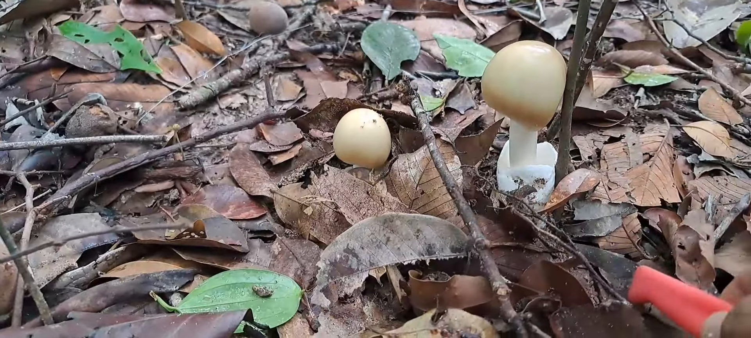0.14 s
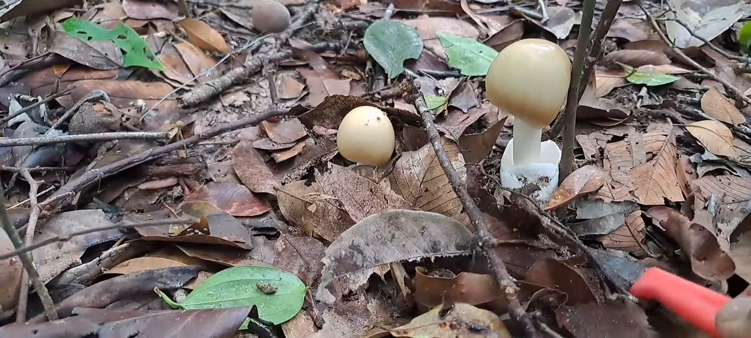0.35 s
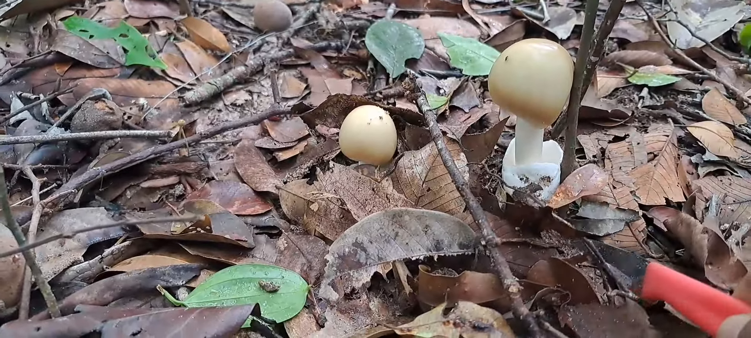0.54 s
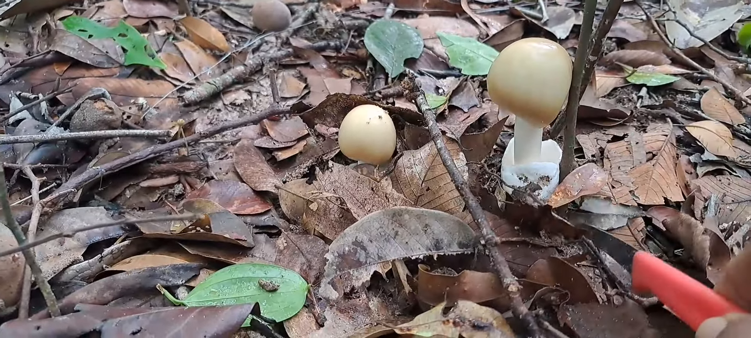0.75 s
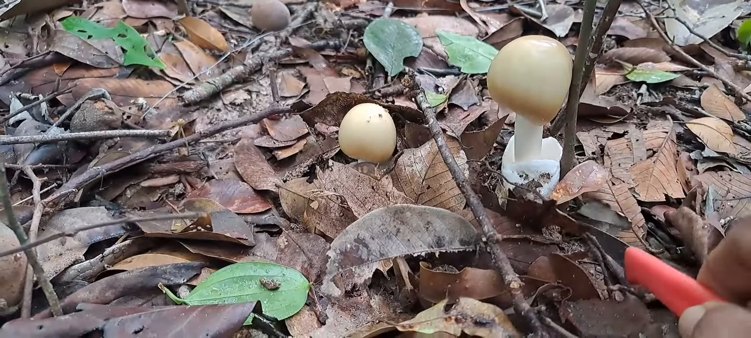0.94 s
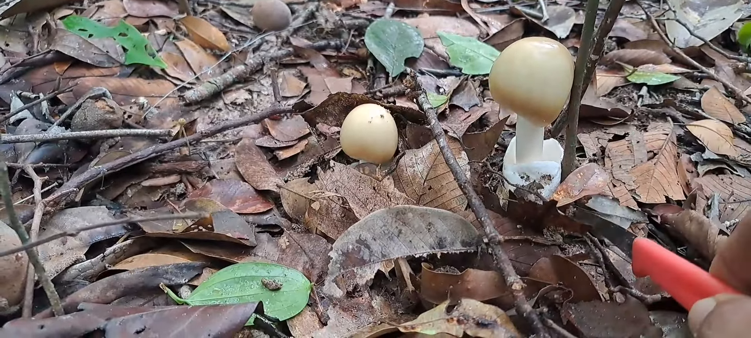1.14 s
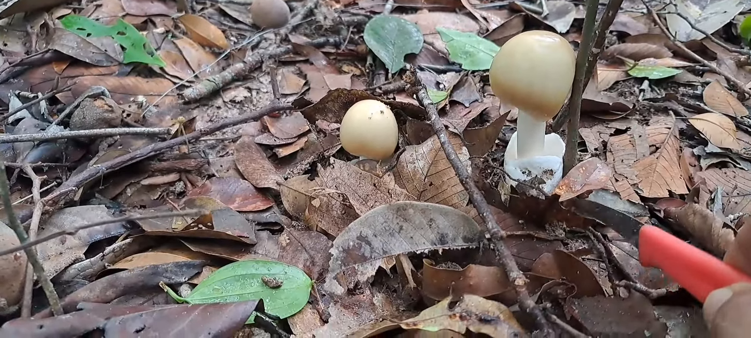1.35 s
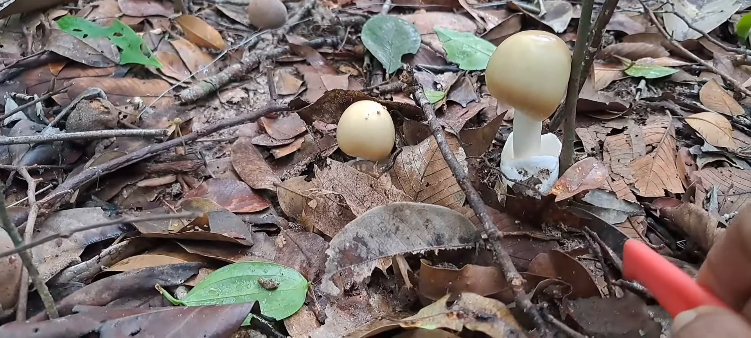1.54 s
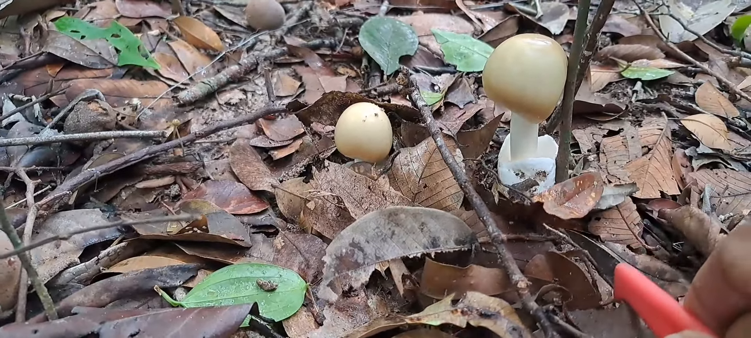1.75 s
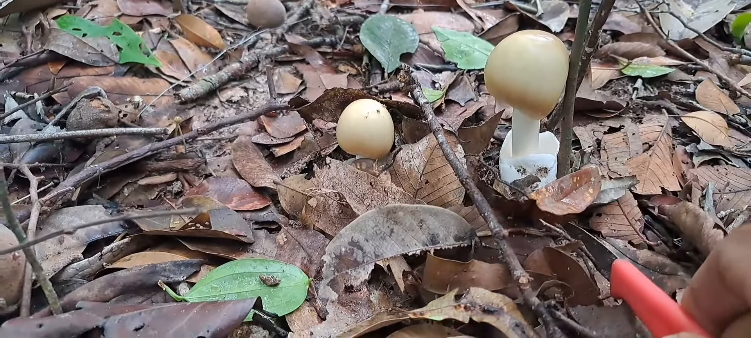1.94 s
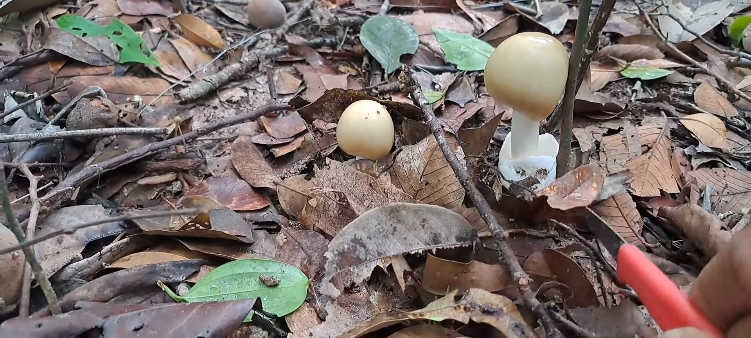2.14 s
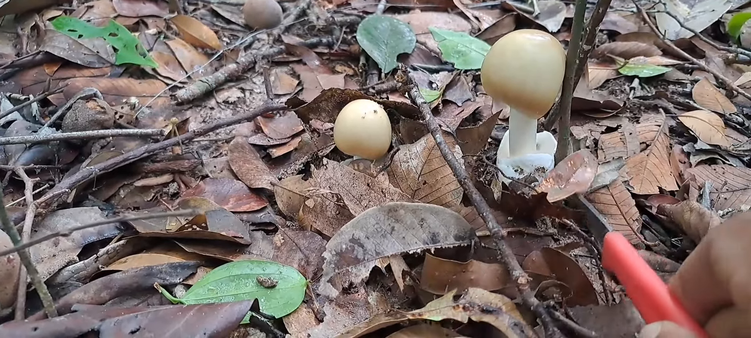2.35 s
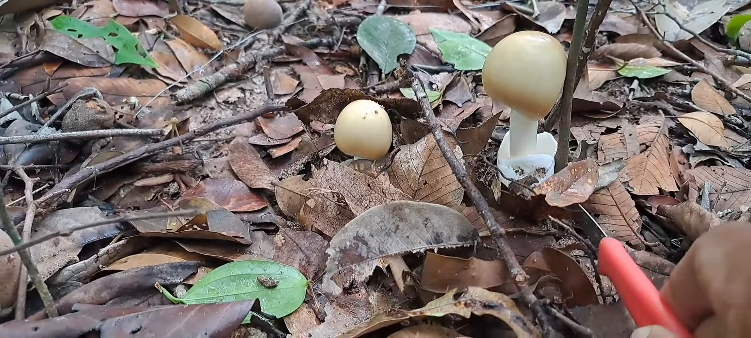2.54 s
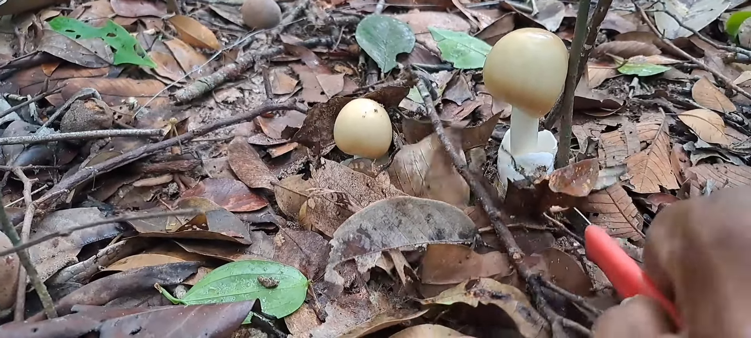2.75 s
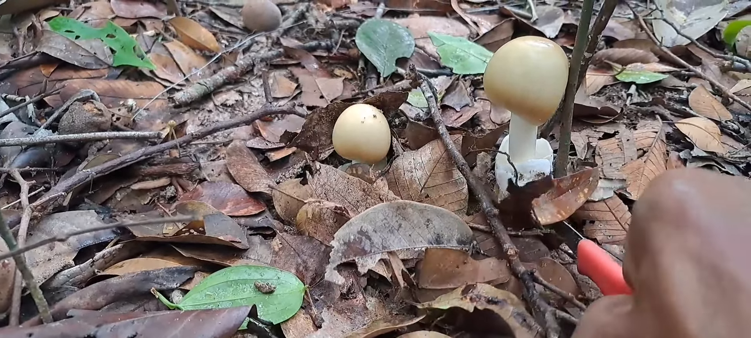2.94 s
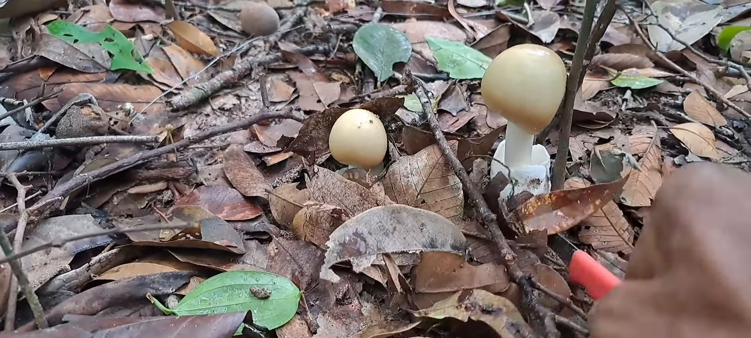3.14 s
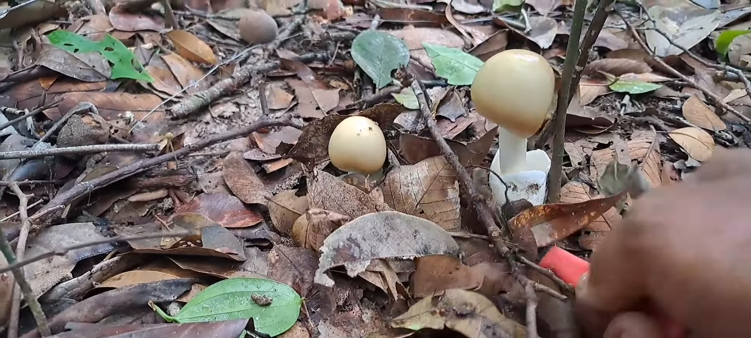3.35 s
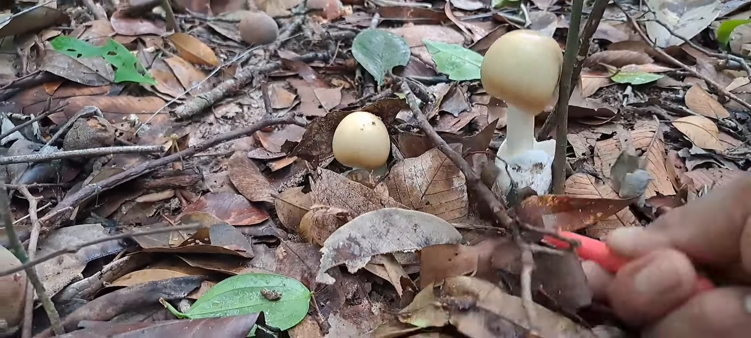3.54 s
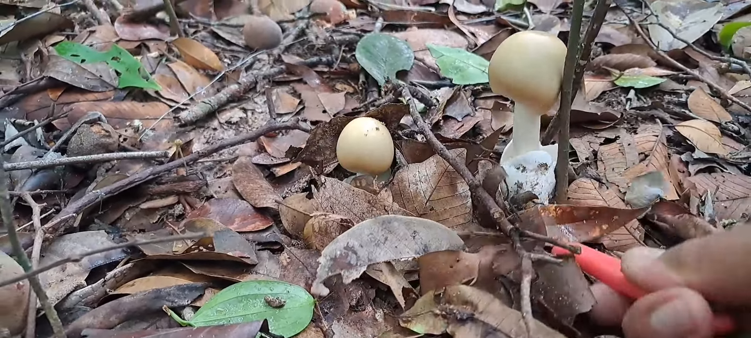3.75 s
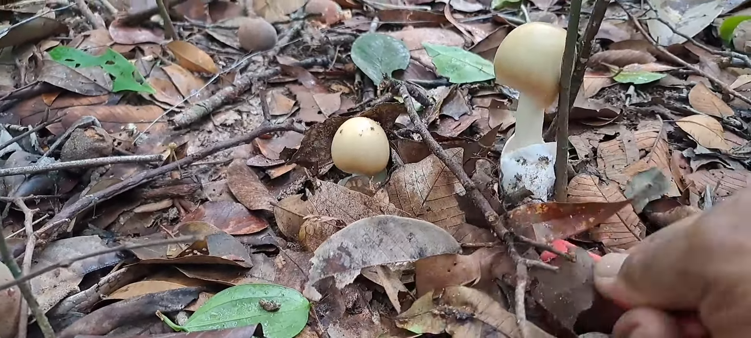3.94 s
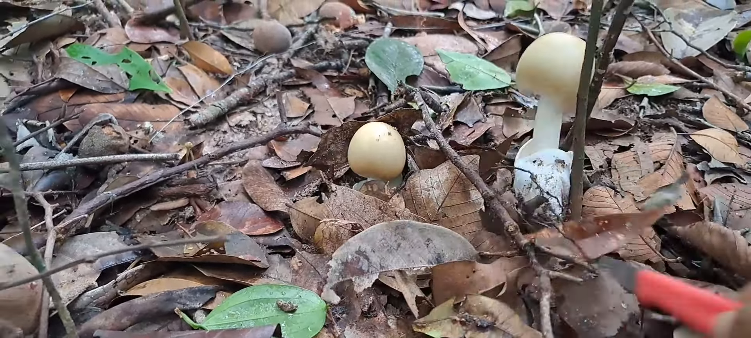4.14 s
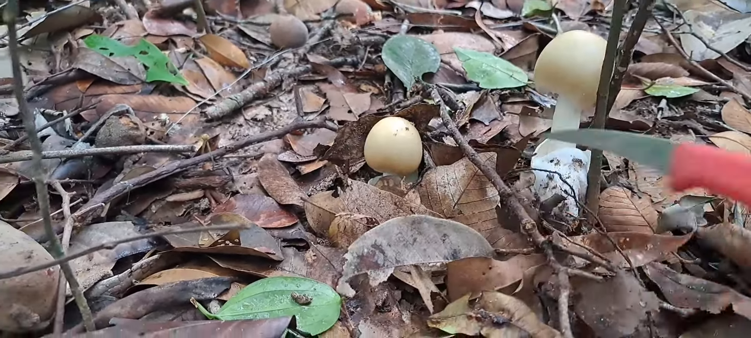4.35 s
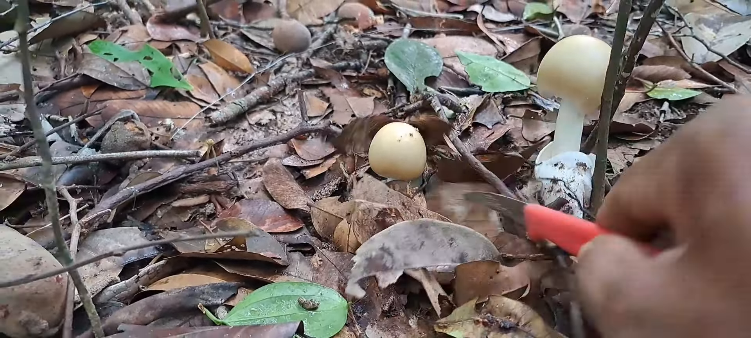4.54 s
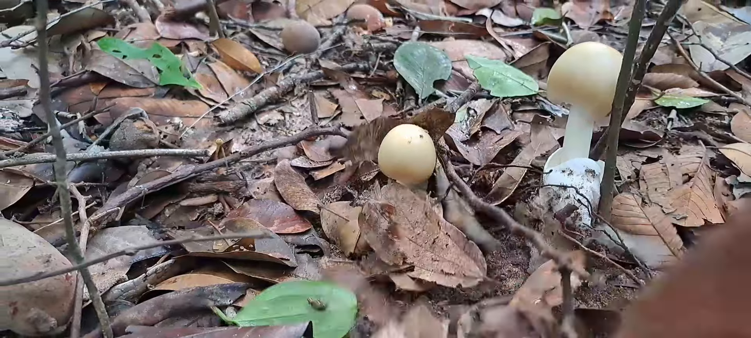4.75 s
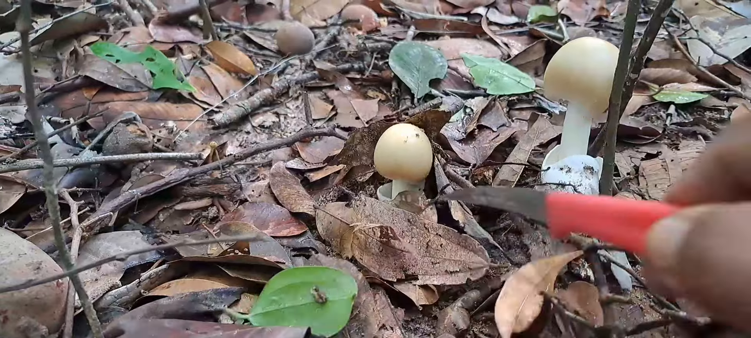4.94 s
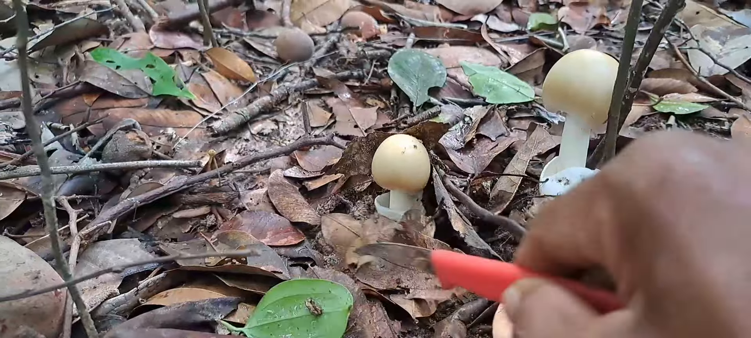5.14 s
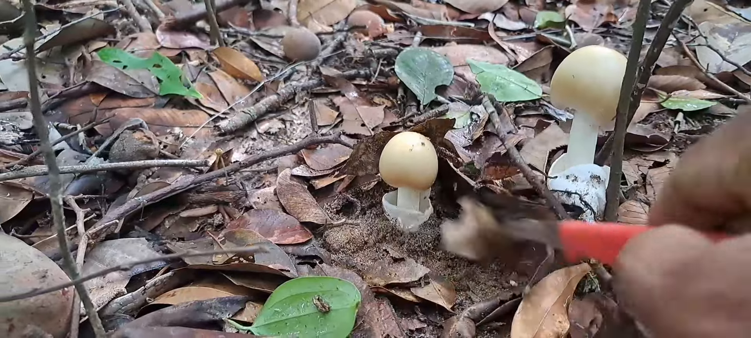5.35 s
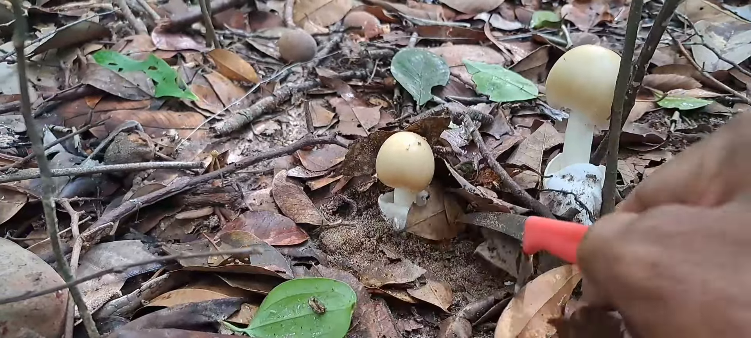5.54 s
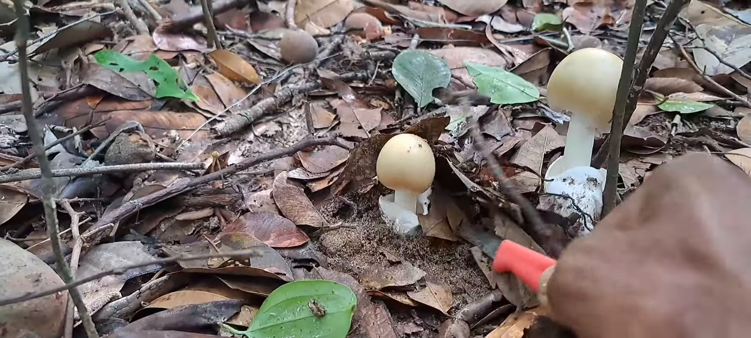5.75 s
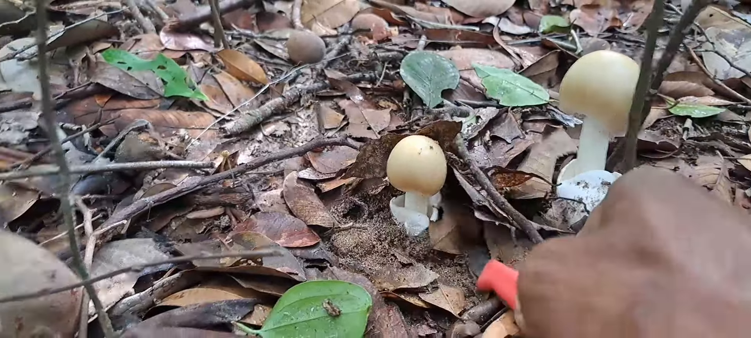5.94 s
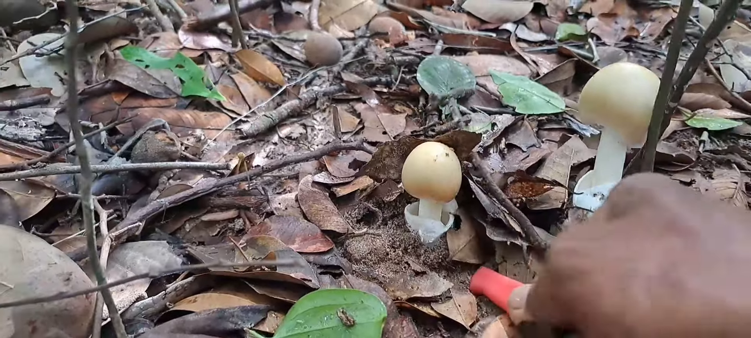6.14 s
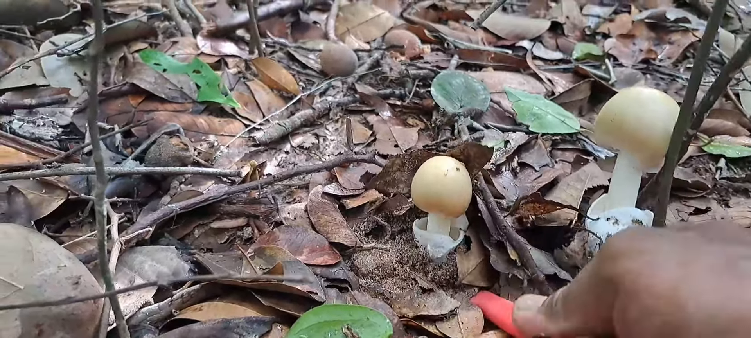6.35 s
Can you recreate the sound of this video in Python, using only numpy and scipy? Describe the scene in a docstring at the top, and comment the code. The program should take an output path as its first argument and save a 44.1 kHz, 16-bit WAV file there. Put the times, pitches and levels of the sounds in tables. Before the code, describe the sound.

Close up, a hand and small blade work through dry leaf litter in a quiet forest. Light rustles and small clicks thin out, then the crackling thickens, with a loud burst of crunches around the middle and another soon after. Soft thuds come from the soil. Far insects hum high and steady, and a bird twice whistles a quick rising run. Stereo microphones sit near the ground.

```python
"""Dry leaf litter rustles and crunches from the start as a hand with a small knife digs a forest floor.
The litter is shaken, spiky noise in third-octave bands; leaves and twigs break as short ringing noise bursts.
Far off, resonant noise makes an insect chorus, mostly near 7 kHz, over the smooth noise of the forest hush.
A bird twice whistles a note and five upward sweeps, with echoes; low noise swells thud in the soil.
All of it reaches two microphones, partly alike and partly unrelated, that ring near 13 kHz."""
import sys
import numpy as np
from scipy import signal
from scipy.io import wavfile

SR = 44100
rng = np.random.default_rng(int(sys.argv[2]) if len(sys.argv) > 2 else 0)


def wav_record(signal):
    """Record a signal, one row per channel, as 16-bit PCM in the file named by sys.argv[1]."""
    frames = np.transpose(np.atleast_2d(signal))
    bounded = np.clip(frames, -1, 1)
    # unit amplitude maps onto the largest positive 16-bit level
    quanta = np.round(bounded * 32767).astype(np.int16)
    wavfile.write(sys.argv[1], SR, quanta)


N = 285812   # samples

# how alike near litter sounds at the two microphones: (f/Hz, likeness from -1 to 1)
NEAR_LIKENESS = [(60, 0.15), (180, 0.796), (550, 0.769), (1650, 0.74), (4970, 0.05), (15000, 0.023)]
# balance of the two microphones: (f/Hz, left-right level/dB)
MICROPHONE_BALANCE = [(60, -2), (300, 1.5), (1500, 0), (5000, 0), (9000, 5), (15000, 5)]
FAR_PAN_DB = -3.5   # far sounds lean right


def amp(db):
    """Decibels to gain."""
    return 10 ** (np.asarray(db) / 20)


def rms_one(x):
    """Scale to rms 1."""
    return x / np.sqrt(np.mean(x ** 2) + 1e-20)


def at_hz(points, hz):
    """Read a (f/Hz, value) table on a log-frequency axis."""
    table_hz, values = np.transpose(points)
    return np.interp(np.log(hz), np.log(table_hz), values)


def band(x, low_hz, high_hz):
    """Butterworth band-pass."""
    edges_hz = [low_hz, min(high_hz, .45 * SR)]
    return signal.sosfilt(signal.butter(2, edges_hz, "band", fs=SR, output="sos"), x)


def resonate(x, hz, width_hz):
    """Two-pole resonance with gain 1 on top."""
    r = np.exp(-np.pi * width_hz / SR)
    feedback = [1, -2 * r * np.cos(2 * np.pi * hz / SR), r * r]
    return signal.lfilter([(1 - r * r) / 2, 0, (r * r - 1) / 2], feedback, x)


def left_right(pan_db):
    """Gains of the two microphones for a left-right difference in dB."""
    return amp(np.array([pan_db, -pan_db]).reshape(2, -1) / 2)


def pair(mid, side, likeness, pan_db):
    """Left and right from a shared and an opposed part."""
    likeness = np.clip(likeness, -.95, .95)
    shared = np.sqrt(1 + likeness) * mid
    opposed = np.sqrt(1 - likeness) * side * np.array([[1], [-1]])
    return (shared + opposed) / np.sqrt(2) * left_right(pan_db)


def swells(s, swell, fade, peak_db, steep=1):
    """Power of each event every millisecond: straight up and down in dB around its loudest moment."""
    t = np.arange(0, N / SR + .001, .001)[:, None] - s
    steps = np.where(t < 0, -t / np.abs(swell), t / np.abs(fade))   # of 20 dB, before steepening
    drop_db = 20 * np.minimum(steep * steps, 6)
    return amp(2 * (peak_db - drop_db))   # doubled dB: power


def per_sample(values):
    """From one value a millisecond to one a sample."""
    return np.interp(np.arange(N) / SR, np.arange(len(values)) / 1000, values)


def level_of(power):
    """Summed power of the events, in dB per sample."""
    return per_sample(10 * np.log10(power.sum(axis=1)))


def pushing():
    """Levels of soil, leaf bodies, blades and crisp edges, and the left-right dB weighted by blade power."""
    # pushes through the leaves: (loudest t/s, swell in s per 20 dB, fade in s per 20 dB, blade level/dB,
    # body level above blades/dB, edge level above blades/dB, left-right level/dB);
    # signs of the times are ignored, and the steepness shortens them
    pushes = [(0.0, .05, 0.1482, -65.5, 3, 6.5, -6.5), (.16, 0.2254, 0.31, -68, -7.5, 11, -5.5),
              (.22, 0.24, 0.055, -68, -2, 9.5, -6), (.3, 0.2067, 0.1, -70.5, 8.5, 1.5, -7),
              (0.411, -0.19, 0.16, -67, -1, 5.5, -8), (.472, -0.04, 0.31, -67.5, -9.5, 9.5, -5),
              (0.521, 0.0519, .07, -65, 5.5, -5, -11), (.71, 0.3133, 0.0632, -63.5, 0, 3, -6),
              (.905, -0.07, -0.48, -70.5, -6, 5.5, -5.5), (.94, 0.0418, 0.122, -60, -6.5, 4.5, -5.5),
              (1.019, 0.24, 0.1078, -69.5, 4.5, 9, -8.5), (1.189, 0.19, .035, -64.5, -10.5, 12, -6.5),
              (1.335, 0.23, 0.11, -78, -16.5, 16.5, -4.5), (1.43, 0.08, 0.165, -75, 6.5, 8.5, -11.5),
              (1.69, -0.06, 0.15, -73, -6, 6, -5), (1.759, 0.0781, 0.11, -69, 7.5, 7.5, -5.5),
              (1.94, 0.18, .09, -76.5, -5, 13.5, -5.5), (2.16, -0.43, 0.1, -74, -15, -2, -7),
              (2.24, 0.1256, 0.1272, -72, 0.5, 7.5, -6), (2.39, 0.13, 0.3, -79.5, 0, 13.5, -3),
              (2.6, 0.15, 0.91, -78.5, 1.5, 16.5, -2), (2.73, 0.1187, 0.2255, -60, 6.5, 4.5, -1.5),
              (2.96, 0.1971, 0.11, -67, 3, 6.5, -6), (3.069, 0.13, 0.11, -66, 5, 8, -4.5),
              (3.17, 0.05, -0.27, -65.5, 2.5, 8, -6), (3.225, 0.068, -0.05, -63.5, 4.5, 5, -5.5),
              (3.331, 0.0818, 0.143, -56.5, 7.5, 7.5, -4.5), (3.38, 0.1145, 0.214, -55, 7, 6, -4),
              (3.552, 0.13, 0.166, -54.5, 5.5, 8.5, -7.5), (3.655, 0.1533, 0.0539, -62, 2, 6, -7.5),
              (3.751, 0.0241, 0.35, -60.5, 0.5, 8, -6.5), (3.849, 0.0575, 0.0519, -56.5, 5, 8, -5),
              (3.91, 0.1227, 0.135, -61, 6, 5, -4), (3.976, 0.15, 0.02, -59.5, -1.5, 8, -6.5),
              (4.13, 0.0908, 0.1026, -51, 2.25, 8, -5), (4.19, 0.1555, 0.1709, -55.5, 3, 11, -6.5),
              (4.455, 0.16, 0.03, -82, 9, 13, -9), (4.524, .003, 0.5047, -62, 4.5, 0.5, -0.24),
              (4.559, 0.01, 0.0591, -43, 2.5, 1.5, -0.3), (4.603, .015, 0.071, -42.5, 2.82, -1.5, -1.6),
              (4.683, 0.0612, 0.1207, -46, 2, 4, -2), (4.725, 0.0657, 0.0831, -42.5, 2.5, 6.5, -5),
              (4.772, 0.0643, 0.1361, -38, 4.5, 6, -2.5), (5.18, 0.0164, 0.2231, -59, -13, 11.5, 0.1),
              (5.25, 0.1021, 0.0446, -56, 8.5, 10.5, 0.27), (5.289, 0.0849, 0.0532, -39.5, 4, 6.5, -1),
              (5.345, 0.0484, 0.17, -58.5, 0, 7.5, -4), (5.435, 0.3548, -0.08, -66, -1, 4, -3.5),
              (5.567, 0, .07, -59, 1, 6.5, -2.5), (5.631, 0.0523, 0.23, -54, 4, 8, -2.5),
              (5.719, 0.1416, 0.27, -59.5, 2, 6.5, -3), (5.8, 0.1549, 0.04, -58, 1, 7, -3),
              (5.87, 0.305, 0.35, -59.5, 0.5, 3, -3), (5.95, 0.2455, 0.2743, -58, 3.5, 9, -3),
              (6.05, 0.25, 0.25, -58, 1, 8.5, -3), (6.121, 0.1282, 0.0638, -52, 4.5, 3.5, -3.5),
              (6.231, 0.1061, 0.17, -63.5, 7, 10.5, -3.5), (6.356, .06, 0.1027, -51, 4.5, 8, -6.5),
              (6.429, 0.196, -0.11, -53, -0.5, 5.5, -5)]
    # how far soil and stems lie below the leaf bodies, less where the blade digs deep: (t/s, level/dB)
    soil_below = [(0, 5), (.3, 7), (.7, 14), (1.1, 3), (1.5, 11), (2.2, 9), (2.7, 8), (3.15, 11.5),
                  (3.35, 2), (3.6, 9.5), (4.0, 3.5), (4.4, 11), (4.6, 4.5), (4.8, 7), (5.2, 15.5),
                  (5.3, 2.5), (5.6, 8), (6.0, 4), (6.25, 7), (6.45, 8)]
    # slope factors of soil, bodies, blades and edges: heavy parts start later and stop sooner
    steepness = [1.162, 1.228, 1.061, 1.032]
    s, swell, fade, blades_db, bodies_db, edges_db, pan_db = np.transpose(pushes)
    soil_db = bodies_db - np.interp(s, *np.transpose(soil_below))
    above_blades = [soil_db, bodies_db, 0, edges_db]
    powers = [swells(s, swell, fade, blades_db + above_db, steep)
              for above_db, steep in zip(above_blades, steepness)]
    blades = powers[2]
    pan = per_sample(blades @ pan_db / blades.sum(axis=1))
    return [level_of(power) for power in powers], pan


def cracks(per_s, spread_db):
    """Random needle clicks of uneven size and sign; rms 1."""
    sizes = amp(spread_db * np.minimum(rng.exponential(1, N), 4)) * rng.choice([-1, 1], N)
    return rms_one(sizes * (rng.random(N) < per_s / SR))


def shaking(per_s, spread_db, last_s):
    """Power of bursts that die away quickly after each crack; mean 1."""
    kicks = cracks(per_s, spread_db) ** 2 + 1e-9
    power = signal.lfilter([1], [1, -np.exp(-1 / (last_s * SR))], kicks)
    return power / power.mean()


def rustle():
    """Third-octave noise shaken by a dense bed, bursts shared by all or by a region, and bare clicks."""
    # f/Hz where the levels of soil, bodies, blades and edges apply
    region_hz = [480, 1550, 5600, 12000]
    # colour of the litter: (f/Hz, third-octave level/dB added to the pushing)
    leaf_colour = [(150, -16.5), (300, -11), (600, -7), (1500, -5), (3300, -3), (4500, 3.5), (5600, 3.5),
                   (7500, 1), (9500, -8), (12500, -0.5), (15500, -11)]
    lag_s_per_db = 2e-5   # a source nearer the right microphone reaches the left one later
    levels, pan_db = pushing()
    wide = shaking(per_s=120., spread_db=4., last_s=0.00765)
    regions = [shaking(per_s=300., spread_db=4., last_s=0.00114) for _ in region_hz]
    white = rng.standard_normal((2, 2, N))   # neighbouring bands get unrelated noise
    shaken = [white * np.sqrt(0.25 + 0.381 * wide + 0.1734 * own) for own in regions]
    needles = cracks(per_s=190.0, spread_db=10.0) * rng.standard_normal((2, N))   # each lands elsewhere
    out, edges_hz = 0, 130 * 2 ** (np.arange(22) / 3)
    for k, (low, high) in enumerate(zip(edges_hz, edges_hz[1:])):
        hz = np.sqrt(low * high)
        place = np.interp(np.log(hz), np.log(region_hz), range(4))
        below = min(int(place), 2)
        level_db = levels[below] + (place - below) * (levels[below + 1] - levels[below])
        source = shaken[int(round(place))][k % 2] + 0.4065 * needles
        mid, side = rms_one(band(source, low, high))
        both = pair(mid, side, at_hz(NEAR_LIKENESS, hz), at_hz(MICROPHONE_BALANCE, hz))
        out = out + amp(level_db + at_hz(leaf_colour, hz)) * both
    lag = np.round(pan_db * lag_s_per_db * SR)   # whole samples
    out[0] = np.interp(np.arange(N) + lag, np.arange(N), out[0])
    return out * left_right(pan_db)


def hush():
    """Smooth far noise of the forest, half an octave at a time."""
    # colour of the hush: (f/Hz, relative level per Hz/dB)
    air_colour = [(15, -39), (25, 1), (124, 5), (1090, -12), (1730, -12.5), (1980, 3), (3230, -40),
                  (5270, -32.5), (7110, 8.5), (9330, -15), (13300, -2.5), (15200, -14), (16500, -33)]
    # how alike the hush is at the two microphones: (f/Hz, likeness from -1 to 1)
    far_likeness = [(60, 0.83), (240, 0.64), (950, -0.16), (3770, 0.36), (15000, -0.26)]
    out, edges_hz = 0, 22 * 2 ** (np.arange(20) / 2)
    white = rng.standard_normal((2, 2, N))   # neighbouring bands get unrelated noise
    for k, (low, high) in enumerate(zip(edges_hz, edges_hz[1:])):
        hz = np.sqrt(low * high)
        mid, side = band(white[k % 2], low, high)
        pan_db = at_hz(MICROPHONE_BALANCE, hz) + FAR_PAN_DB
        out = out + amp(at_hz(air_colour, hz)) * pair(mid, side, at_hz(far_likeness, hz), pan_db)
    return amp(-67.5) * rms_one(out)


def insects_and_microphone_ring():
    """Far singers blur into resonant noise, unrelated left and right; the microphones ring near 13 kHz."""
    # resonances of the far noise: four of the insect chorus, and a wide microphone resonance near 13 kHz:
    # (f/Hz, width of each of two passes/Hz, level before panning/dB)
    resonances = [(6864, 332, -67), (7315, 433, -69), (5986, 1500, -74), (13000, 1800, -79.5),
                  (2024, 320, -87)]
    out = 0
    for hz, width_hz, level_db in resonances:
        once = resonate(rng.standard_normal((2, N)), hz, width_hz)
        out = out + amp(level_db) * rms_one(resonate(once, hz, width_hz))
    return out * left_right(FAR_PAN_DB)


def add_break(out, fade, s, peak_db, ring_hz, tilt_db, pan_db):
    """Noise under a fade, in three colours, plus one narrow ring: of the piece or, near 12.5-13 kHz and
    above, of the microphone."""
    # colours of a break: (low f/Hz, high f/Hz)
    colours = [(380, 1139), (1500, 8330), (10500, 13850)]
    low_db, mid_db, high_db = tilt_db / 2, 5, -tilt_db / 2
    ring_db = max(low_db, mid_db, high_db) + 1.5
    noise = rng.standard_normal((2, len(fade))) * fade
    filtered = [band(noise, low, high) for low, high in colours]
    filtered.append(resonate(noise, ring_hz, ring_hz / 5.04))
    shares = [(low_db, 600), (mid_db, 3400), (high_db, 12400), (ring_db, ring_hz)]   # (dB, Hz of likeness)
    burst = 0
    for (share_db, hz), part in zip(shares, filtered):
        mid, side = rms_one(part)
        burst = burst + amp(share_db) * pair(mid, side, at_hz(NEAR_LIKENESS, hz), pan_db)
    at = round(s * SR)
    peak = np.abs(burst.mean(axis=0)).max()   # of the mean of both microphones
    out[:, at:at + len(fade)] += amp(peak_db) * burst / peak


def crunches():
    """Whole leaves crushed: each noise burst swells for a moment and crumbles away."""
    # (t/s, peak level/dB, narrow ring f/Hz, low above high share level/dB, left-right level/dB)
    crushed = [(.16, -45.5, 14300, -18.5, -0.5), (.684, -45.5, 5200, -17, -8.5), (.7, -48, 1815, -16.5, -5),
               (1.169, -50, 13150, -31, -2), (1.746, -45.5, 6500, -4, -0.47),
               (2.159, -51.5, 6760, -10, -4.5), (2.234, -59, 2400, -4, -3), (2.347, -63, 447, 23, -1.13),
               (2.39, -59, 414, 15, -0.24), (2.723, -43, 1370, 0.7, -5), (2.778, -36, 3370, 1.2, -2),
               (2.959, -48, 7130, -3.5, 2.5), (3.212, -43.5, 4260, -8.5, -8),
               (3.224, -46.5, 4290, 1.98, -2.7), (3.329, -31, 399, 22, -2.53),
               (3.369, -29.5, 1860, 8, -2.3), (3.392, -33.5, 4840, -10.5, 2), (4.253, -34, 7400, -19, -5.5),
               (4.557, -30, 730, -12.5, -2.5), (4.608, -26.5, 5850, -23.5, -4.5),
               (4.679, -28, 4600, -10.5, -2.26), (4.71, -23.5, 2140, 12, -2),
               (4.72, -20.5, 4670, 0.9, 1.28), (4.768, -20.5, 11600, -4, 7), (5.212, -27.5, 1915, -18.5, 4),
               (5.266, -26.5, 11800, -18.5, 11.5), (5.277, -21, 6840, -9, -0.97),
               (5.941, -36.5, 1990, -11, -1.4)]
    swell_s, t60_s = 0.00189, 0.0392
    out, t = np.zeros((2, N + 3000)), np.arange(3000) / SR
    fade = np.minimum(t / swell_s, 1) * amp(-60 * t / t60_s)
    for crunch in crushed:
        add_break(out, fade, *crunch)
    return out[:, :N]


def snaps():
    """Leaves and twigs snap: noise bursts crack sharply about 1 ms in and rattle faintly on."""
    # (t/s, peak level/dB, narrow ring f/Hz, low above high share level/dB, left-right level/dB)
    snapped = [(.469, -33, 7400, -19, -5), (.522, -49, 1000, -1.5, -5), (.59, -37.5, 7000, -21, 2.1),
               (.664, -38.5, 6500, -21, -4.5), (.939, -33, 12700, -17.5, -0.17),
               (.974, -46.5, 12600, -7.5, 0), (1.088, -42, 6780, -26.5, -6), (1.349, -57, 890, 8, -3.5),
               (1.457, -54, 6910, -14.5, -9.5), (1.146, -48, 6760, -34.5, -1.5),
               (1.692, -50, 7450, -5.5, 5), (1.778, -42.5, 7000, -15.5, -0.57),
               (1.883, -51, 4780, -29.5, -3.5), (1.929, -49, 7110, -28, 0.5),
               (2.607, -31.5, 10900, -16.5, 1.5), (2.685, -33.5, 3760, -9, 0.5),
               (2.715, -37.5, 3860, 7, -3.36), (2.765, -41, 3500, -3.1, -2.2),
               (2.879, -37, 7140, -16, -0.5), (3.041, -41.5, 4230, -10.5, -10),
               (3.05, -38, 4200, -13.5, -3.6), (3.312, -35, 5000, -11.5, -1), (3.319, -34, 5070, -21, -3),
               (3.329, -35, 755, 5, -7), (3.441, -34, 4760, 12.5, -10.5), (3.496, -39, 4680, -15.5, -10.5),
               (3.552, -32, 12700, -4.5, -5), (3.604, -30.5, 6850, -10.5, -4.16),
               (3.657, -35, 13100, -12, -13), (3.735, -40, 6940, -8, -3), (3.76, -34.5, 7040, -21.5, -7),
               (3.824, -32, 7400, -13, -5), (3.863, -35, 7000, -3.32, -9.5),
               (3.942, -40.5, 12700, -23.5, -8), (3.951, -26.5, 13000, -35, -1.6),
               (3.992, -38, 6870, -2.5, -7), (4.062, -43, 7190, -29, -1), (4.146, -18.5, 12880, -27.5, -1),
               (4.184, -29.5, 7800, -32, -3), (4.207, -30.5, 12600, -33.5, -13),
               (4.523, -35, 1666, 2.5, -3), (4.573, -31.5, 4670, 7, -1.5), (4.592, -23.5, 5710, -1, -2.3),
               (4.603, -20, 5870, -8, 1.5), (4.67, -27.5, 1960, -2.5, -1.3), (4.783, -23, 3300, -16.5, 1),
               (4.815, -18.5, 12830, -13.5, 8), (5.039, -46.5, 1990, -7, -4),
               (5.089, -44, 6520, -16.5, 3.14), (5.173, -38, 3180, -12.5, 2), (5.291, -20.5, 1880, 8, -1),
               (5.535, -42.5, 12500, -20.5, -0.6), (5.607, -39.5, 2030, 13.5, 1.5),
               (5.621, -35.5, 2000, 12, -3), (5.711, -31, 5700, -1, -3.5), (5.817, -24, 3300, -10, -3.5),
               (5.835, -38, 6880, -6.5, -5), (5.849, -39.5, 2060, 2.5, -0.7), (5.888, -31.5, 3370, 1, -1.5),
               (5.911, -29.5, 2070, 1.5, 0.2), (5.982, -30.5, 6020, -16.5, -10),
               (6.019, -33.5, 936, 2.5, -4), (6.042, -33.5, 3730, -4, -8.5), (6.059, -35, 6410, 2.32, -5.5),
               (6.113, -36, 1510, -9, -17.5), (6.127, -34, 1030, 6, -5), (6.168, -42.5, 1320, 10.5, -7.5),
               (6.186, -40, 8000, -23, -9.5), (6.223, -37.5, 980, 14.5, -5.5), (6.308, -39.5, 7150, -5, -2),
               (6.348, -39, 7040, -6, 4), (6.3532, -19, 2210, -2, -3.5), (6.368, -26.5, 7600, -27, -8.5),
               (6.389, -33.5, 2090, -4, -4.5), (6.417, -29, 7570, -10, -8)]
    out, t = np.zeros((2, N + 3000)), np.arange(3000) / SR
    crack = amp(-60 * np.abs(t - .001) / 0.00211)   # 60 dB up or down in 2.11 ms
    rattle = amp(-11 - 60 * t / 0.0142) + amp(-25.5 - 60 * t / 0.048)
    for snap in snapped:
        add_break(out, crack + rattle, *snap)
    return out[:, :N]


def whistle(length_s, first_hz, last_hz):
    """A sine that rises fast and levels off, loudest early, with soft ends."""
    bend, fade_db, edge_s = 4.5, 13, 0.00224   # fade_db: loss over the note
    u = np.arange(round(length_s * SR)) / (length_s * SR)
    hz = last_hz + (first_hz - last_hz) * (1 - u) ** bend
    ends = np.minimum(np.minimum(u, 1 - u) * length_s / edge_s, 1)
    return np.sin(2 * np.pi * np.cumsum(hz) / SR) * amp(-fade_db * u) * ends


def echoes(dry_song):
    """Near branches scatter densely at first; far trunks answer longer."""
    t = np.arange(SR) / SR
    trunks = amp(-60 * t / 0.712)   # t60 0.712 s
    branches = amp(6 - 60 * t / .12)
    onset = np.minimum(t / .01, 1) ** 2   # echoes build over 10 ms
    trees = rng.standard_normal((2, SR)) * (trunks + branches) * onset
    trees /= np.sqrt(np.sum(trees ** 2, axis=1, keepdims=True))
    return amp(5.5) * signal.fftconvolve(dry_song, trees, axes=1)[:, :N]


def bird():
    """Rising whistled notes, smeared by echoes off the trees."""
    # songs: (t/s, level/dB, left-right level/dB, opening note level/dB, opening note t/s after start)
    songs = [(.479, -50, -3, 7.5, -.001), (5.045, -51.5, -5, -3, .005)]
    # opening note: (length/s, first f/Hz, last f/Hz)
    opening = (0.016, 4433, 4740)
    # five sweeps: (t/s after start, length/s, first f/Hz, last f/Hz, level relative to song/dB)
    sweeps = [(0.045, 0.049, 2637, 3849, -4.5), (0.092, 0.03852, 2580, 3744, -0.5),
              (0.139, 0.04152, 2619, 3727, 1.5), (.192, .04, 2600, 3550, 0),
              (0.238, 0.03464, 2594, 3431, -3)]
    out = np.zeros((2, N))
    for start, song_db, pan_db, opening_db, opening_s in songs:
        notes = [(opening_s, *opening, opening_db), *sweeps]
        for after, length_s, first_hz, last_hz, note_db in notes:
            note = whistle(length_s, first_hz, last_hz)
            at = round((start + after) * SR)
            out[:, at:at + len(note)] += amp(song_db + note_db) * left_right(pan_db) * note
    return out + echoes(out)


def thuds():
    """Low lumpy noise pushes as hand and blade press the ground."""
    # (loudest t/s, swell in s per 20 dB, fade in s per 20 dB, level/dB)
    presses = [(3.33, 0.1631, 0.19, -64), (3.39, 0.3, 0.03, -60), (3.6, 0.37, 0.22, -74.5),
               (3.86, 0.17, 0.09, -69.5), (4.18, 0.07, 0.26, -67.5), (4.56, 0.17, 0.45, -69),
               (4.82, 0.1946, .06, -48.5), (5.03, 0.44, 0.1156, -67), (5.29, .06, 0.19, -65),
               (5.95, 0.22, 0.1, -65), (6.11, 0.11, 0.2, -58.5), (6.32, 0.0748, 0.1654, -53),
               (6.37, 0.13, 0.1, -63.5)]
    level_db = level_of(swells(*np.transpose(presses)))
    mid, side = rms_one(band(rng.standard_normal((2, N)), 38.6, 169))
    return amp(level_db) * pair(mid, side, .45, -3.5)


def scene():
    """Everything at the two microphones."""
    near = rustle() + crunches() + snaps() + thuds()
    far = hush() + insects_and_microphone_ring() + bird()
    return near + far


def record(dry):
    """The top is cut steeply above 15.76 kHz."""
    return signal.sosfilt(signal.ellip(12, .3, 60, 15760, fs=SR, output="sos"), dry)


dry = scene()
out = record(dry)
wav_record(out)
```